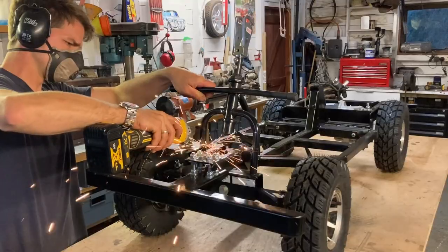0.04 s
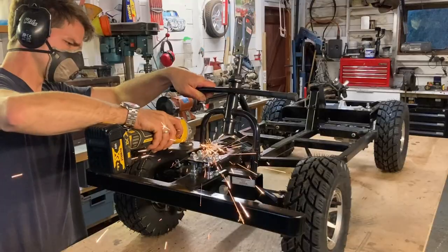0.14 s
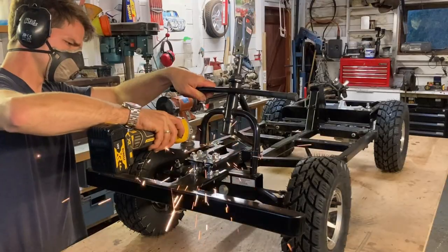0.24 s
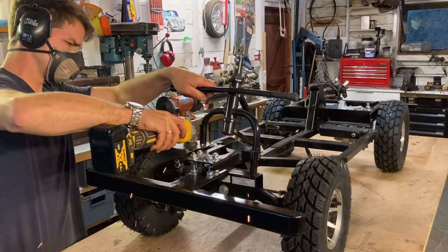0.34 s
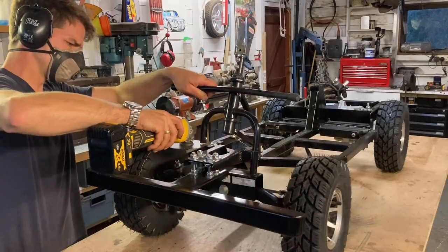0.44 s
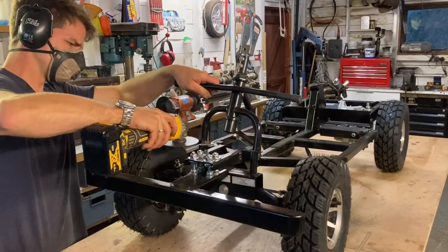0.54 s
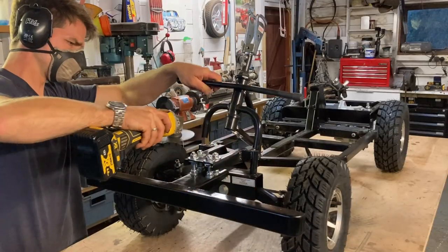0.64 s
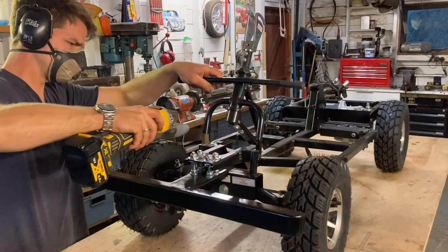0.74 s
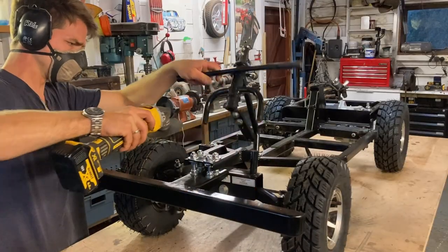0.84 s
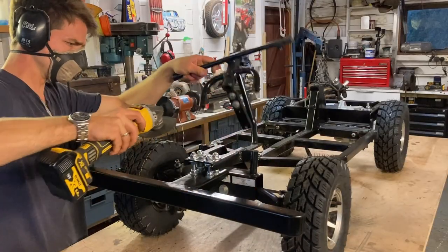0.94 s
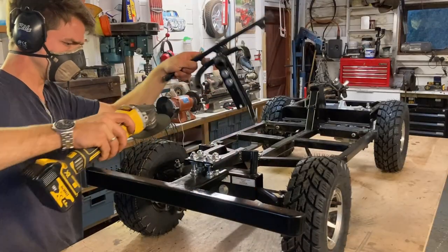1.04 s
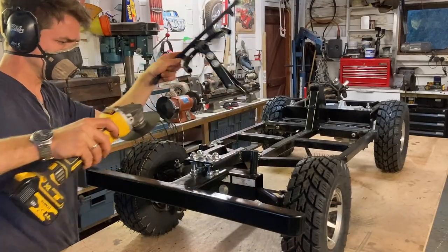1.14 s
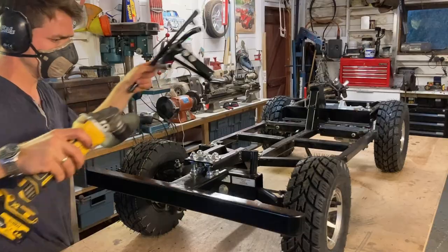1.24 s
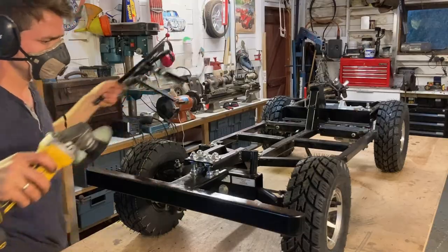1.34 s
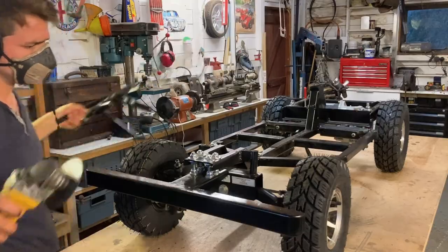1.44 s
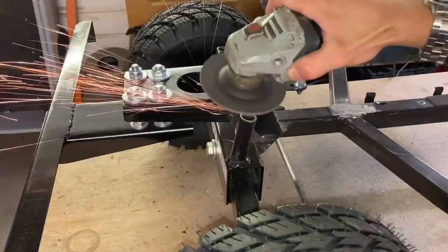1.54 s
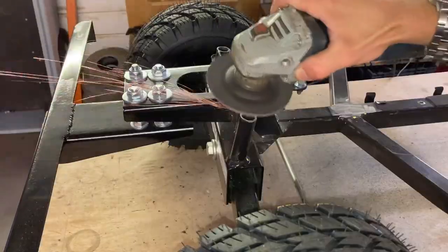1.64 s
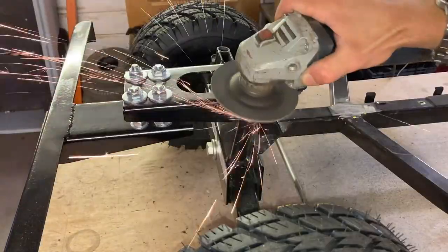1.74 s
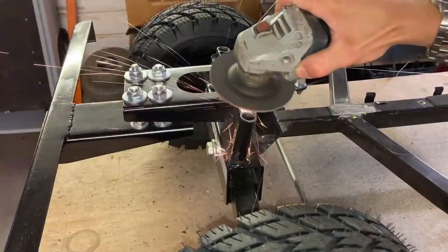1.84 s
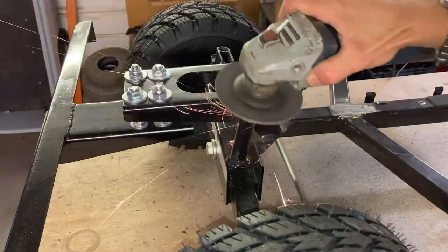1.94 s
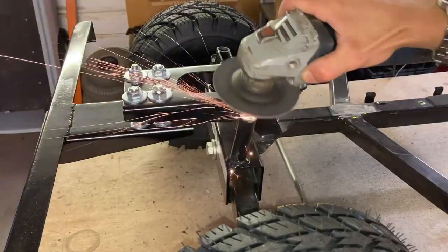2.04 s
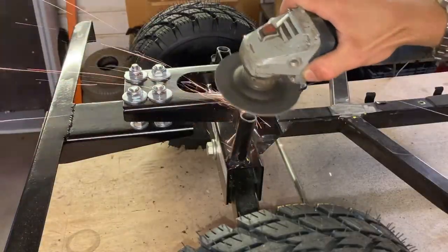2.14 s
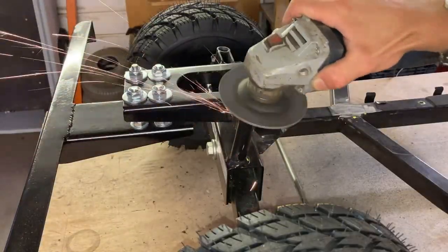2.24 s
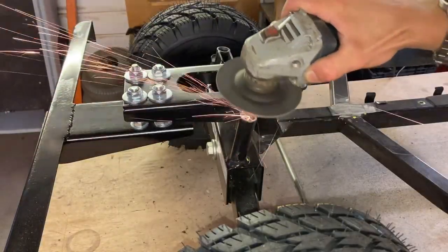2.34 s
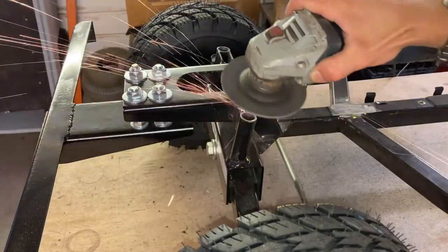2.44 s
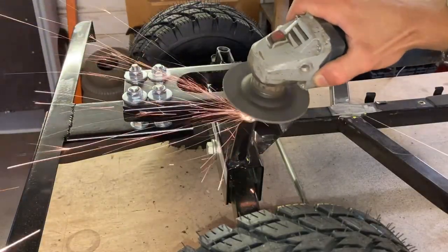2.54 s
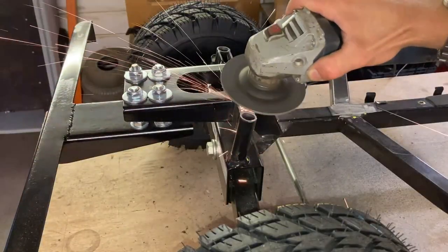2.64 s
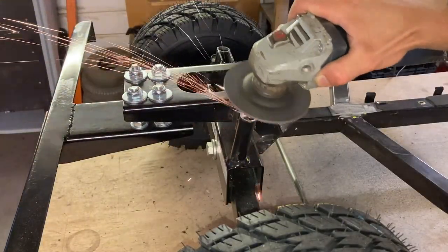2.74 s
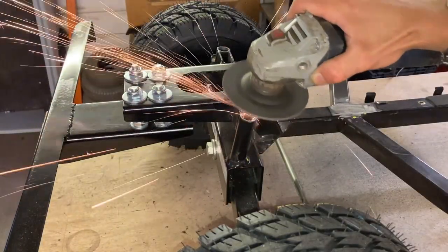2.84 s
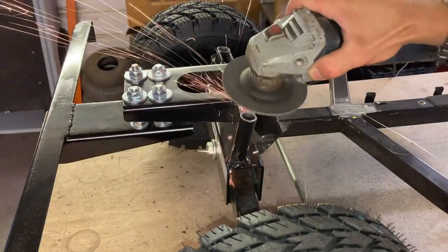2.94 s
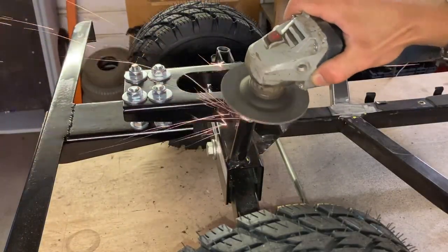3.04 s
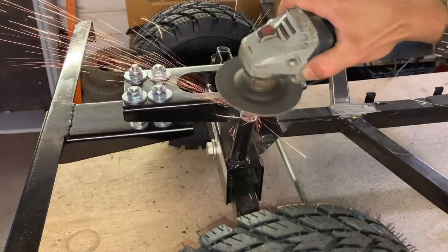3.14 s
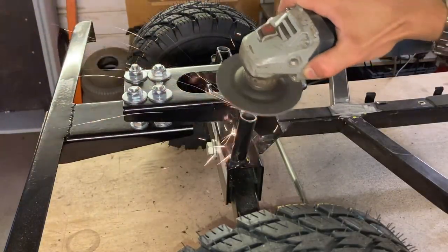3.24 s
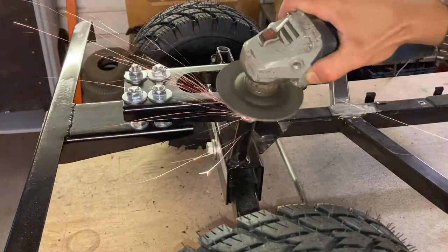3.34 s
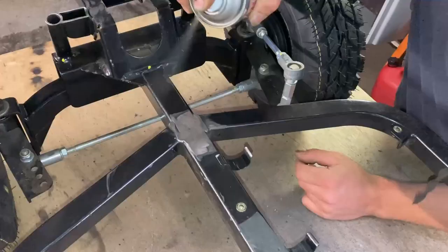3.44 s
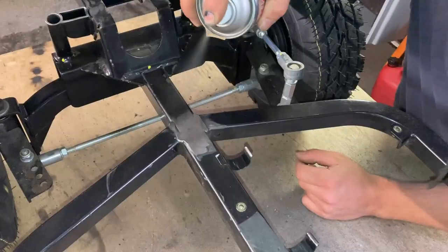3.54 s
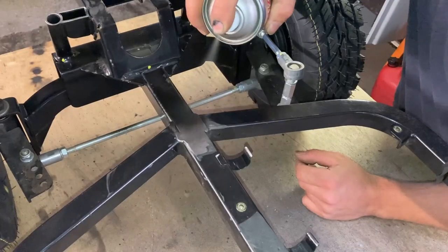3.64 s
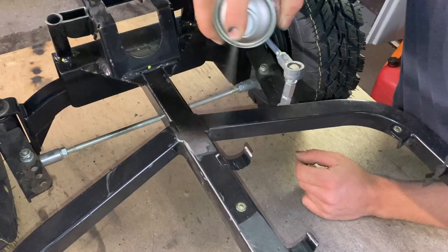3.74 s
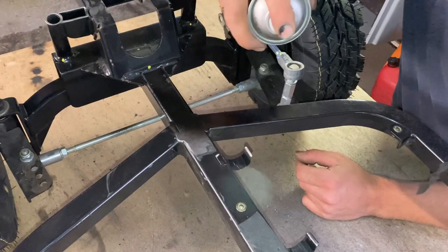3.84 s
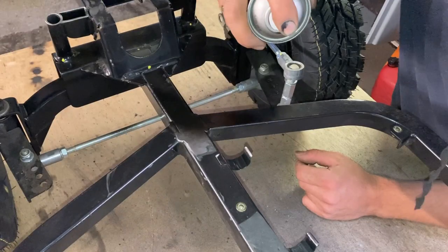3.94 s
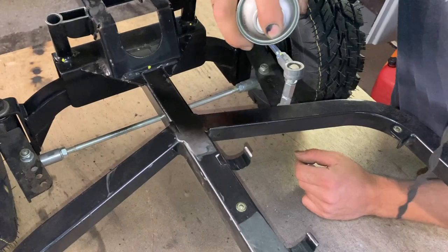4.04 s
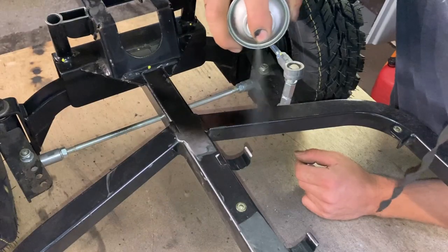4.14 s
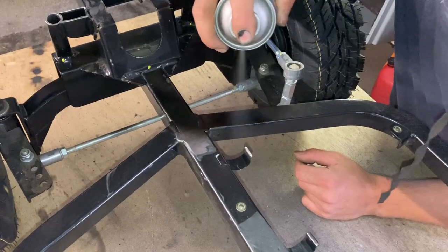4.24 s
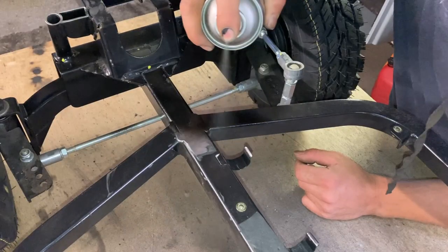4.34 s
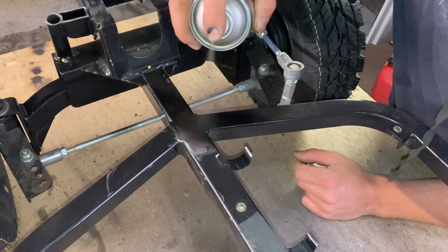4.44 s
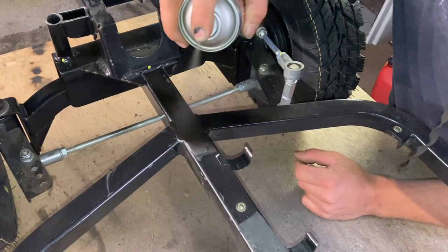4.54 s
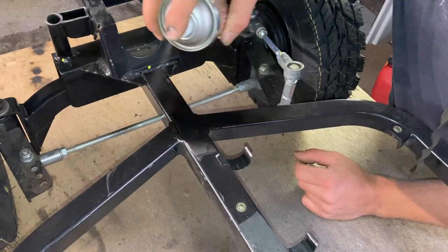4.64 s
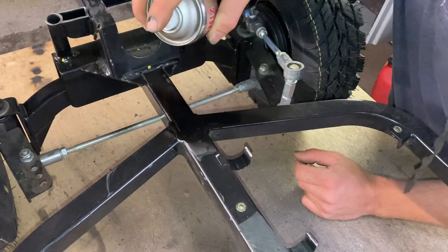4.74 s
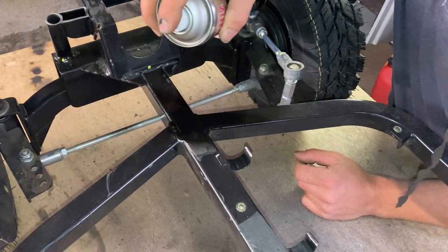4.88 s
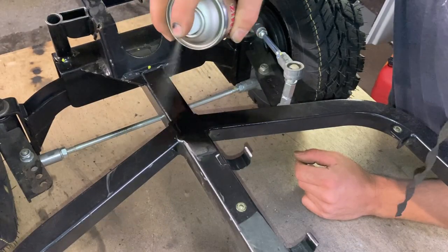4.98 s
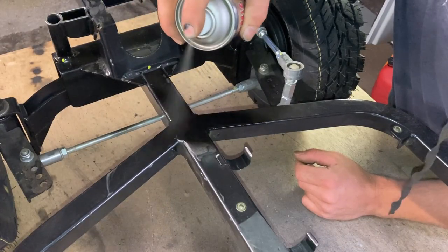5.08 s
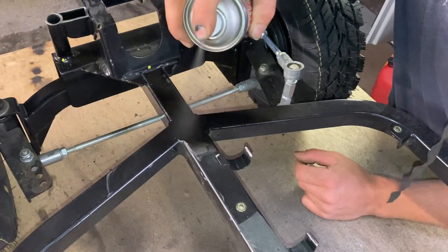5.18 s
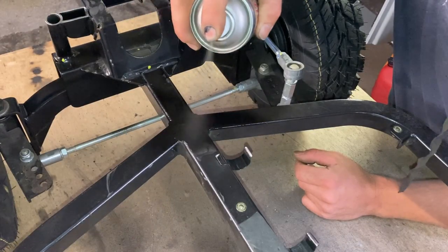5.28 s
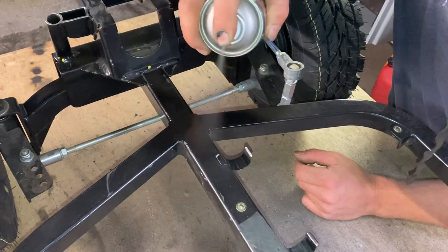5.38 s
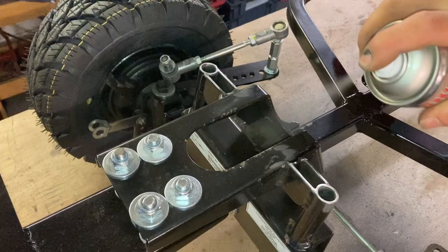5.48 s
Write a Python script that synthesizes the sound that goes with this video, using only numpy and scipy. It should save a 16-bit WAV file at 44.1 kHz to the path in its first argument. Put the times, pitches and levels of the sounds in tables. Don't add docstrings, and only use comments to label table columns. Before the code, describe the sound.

A power cutter buzzes harshly through a steel tube, spins free with a whine, then a grinder rasps steadily, then an aerosol can hisses three times.

```python
import sys
import numpy as np
from scipy import signal
from scipy.fft import rfft, irfft, next_fast_len
from scipy.io import wavfile
from scipy.ndimage import uniform_filter1d, map_coordinates

SR = 44100
rng = np.random.default_rng(int(sys.argv[2]) if len(sys.argv) > 2 else 0)


def pcm_store(signal):
    levels = np.round(np.clip(np.atleast_2d(signal), -1, 1) * 32767)
    wavfile.write(sys.argv[1], SR, levels.astype(np.int16).T)


def decibels_to_gain(level_db):
    exponent = np.asarray(level_db, float) / 20
    return 10 ** exponent


N = 242991
T = np.arange(N) / SR
M = next_fast_len(N, True)
HZ = np.fft.rfftfreq(M, 1 / SR)


def unit(x):
    return x / np.sqrt(np.mean(x ** 2))


def curve(rows):
    rows = np.array(rows)
    return [np.interp(T, rows[:, 0], column) for column in rows.T[1:]]


def tint(x, points):
    hz, db = np.transpose(points)
    gain = decibels_to_gain(np.interp(np.log(HZ + 1), np.log(hz), db))
    return unit(irfft(rfft(x, M) * gain, M)[:N])


def ring(x, hz, width):
    return unit(signal.lfilter(*signal.iirpeak(hz, hz / width, SR), x))


def walk(rate, size=N):
    knots = rng.standard_normal(12000)
    knots = uniform_filter1d(uniform_filter1d(knots, size=4), size=4)
    return np.interp(T[:size] * 4 * rate, np.arange(len(knots)), unit(knots))


def grit(spread_db, flicker_db):
    sizes = np.minimum(rng.exponential(size=N), 4)
    flurries = flicker_db * walk(300) + flicker_db * walk(36)
    return rng.standard_normal(N) * decibels_to_gain(spread_db * sizes + flurries)


# (time [s], bite level [dB])
CUT_LEVEL = [
    (0.0, -28),
    (0.162, -26),
    (0.192, -28),
    (0.466, -24),
    (0.48, -22),
]
# (frequency [Hz], density [dB per Hz])
BITE_SPECTRUM = [(40, -49), (200, -26), (700, -39), (1600, -13.5), (2300, 2), (3500, -8.5), (5000, -18),
                 (7000, 2.5), (8500, -3), (11500, -2.5), (14000, -4), (15500, -7.5)]
# (multiple of the turn [-], level in the full wall [dB], as it gives way [dB])
TUBE_ORDERS = [(3, -26.5, -13), (7, -19.5, -10.5), (6, -30, -16), (15, -8.5, -2.5), (4, -23, -9),
               (17, -6.5, -5), (18, 0.5, -9), (19, -3, 3), (21, -17, -4), (23, -2, -27), (24, -2.5, -19),
               (26, -5.5, -7.5), (30, -2, -8), (36, -3, -0.5)]


def cutting():
    turn_hz, speed_up_hz = 124.28, 0.8
    sag_hz, sag_s, sag_span_s = 0.5, 0.29, 0.07
    thin = np.clip((T - 0.26) / 0.073, 0, 1)
    sag = sag_hz * np.exp(-((T - sag_s) / sag_span_s) ** 2)
    phase = 2 * np.pi * np.cumsum(turn_hz + speed_up_hz * thin - sag) / SR
    phase = phase + 0.04 * thin * walk(14)

    peak_order, rest_peak_db, fall_db, floor_db = 21.8, -15, 8.5, -36.5
    strong = {round(k): (deep_db, thin_db) for k, deep_db, thin_db in TUBE_ORDERS}
    tube = np.zeros(N)
    for k in range(1, 39):
        rest_db = max(rest_peak_db - fall_db * np.log2(k / peak_order) ** 2, floor_db)
        deep_db, thin_db = strong.get(k, (rest_db, rest_db + 7))
        wander = (0.08 + 0.24 * thin[:SR]) * walk(8.8, size=SR)
        db = deep_db + thin[:SR] * (thin_db - 13.0 - deep_db) + 3.3 * walk(14.5, size=SR)
        tube[:SR] += decibels_to_gain(db) * np.sin(k * phase[:SR] + 2 * np.pi * rng.random() + wander)

    wear_per_s = 14
    rough = rng.standard_normal((12, 355))
    place = phase / (2 * np.pi) % 1 * (rough.shape[1] - 1)
    rim = map_coordinates(rough, [wear_per_s * T, place], order=1, mode="mirror")
    rim = tint(rim * decibels_to_gain(2 * walk(32.5)), [(2500, -92), (4000, -32), (5200, -15), (7000, -16.5),
                                           (8500, -19), (12000, -12), (15000, -27)])

    gate = decibels_to_gain(1.5 * np.cos(2 * phase) + 2.0 * np.cos(phase + 0.4) + 1.1 * np.cos(6 * phase))
    bite = tint(grit(0.8, 0.92) * gate, BITE_SPECTRUM)
    let_go_s, let_go_decay_s = 0.46, 0.034
    held = np.exp(-np.clip(T - let_go_s, 0, None) / let_go_decay_s)

    after = np.clip(T - 0.44, 0, None)
    thud = decibels_to_gain(-40.5) * np.sin(2 * np.pi * 105 * after) * np.exp(-after / 0.026)
    low = decibels_to_gain(-40.0) * np.sin(2 * np.pi * 368 * T) * np.exp(-((T - 0.495) / 0.049) ** 2)
    contact = decibels_to_gain(4.0) * bite + decibels_to_gain(5.5 - 6.3 * thin) * rim + decibels_to_gain(2.0) * tube
    return held * decibels_to_gain(curve(CUT_LEVEL)[0] - 4.5) * contact + thud + low


# (time [s], level [dB])
FREE_LEVEL = [
    (0.58, -45),
    (0.992, -44.5),
    (1.258, -39.5),
    (1.268, -38.5),
    (1.386, -41.5),
    (1.496, -38.5),
    (1.538, -40.5),
    (1.59, -36.5),
]
# (frequency [Hz], density [dB per Hz])
AIR_SPECTRUM = [(40, -7), (90, -7.5), (200, -23.5), (350, -10.5), (700, -9), (1100, -3.5), (2300, 0),
                (5000, -1.5), (8500, -5), (11500, -7.5), (14000, -15), (15500, -21.5)]


def spinning():
    air = tint(grit(1.0, 0.43), AIR_SPECTRUM)
    top = signal.sosfilt(signal.butter(2, 4500, "high", fs=SR, output="sos"), air)
    return decibels_to_gain(curve(FREE_LEVEL)[0] + 4.5) * (air + (decibels_to_gain(3.0) - 1) * top)


def motor():
    rotor_hz, poles = 442.7, 8
    whine_db, beam, far_db = -38.5, 2, -42
    whine_db = whine_db + beam * (curve(FREE_LEVEL)[0] - far_db)
    phase = 2 * np.pi * rotor_hz * T + 0.07 * walk(3)
    whine = np.sin(poles * phase) * decibels_to_gain(1.9 * walk(9.15))
    whine += decibels_to_gain(-27) * np.sin(2 * poles * phase + walk(9))
    disc_db = -61.0 - 9.6 * np.clip(T - 0.5, 0, 1) + 2.3 * walk(2.8)
    disc = decibels_to_gain(disc_db) * np.sin(2 * np.pi * 372 * T)
    unload = np.clip((T - 0.3) / 0.067, 0.15, 1)
    return unload * (decibels_to_gain(whine_db + 2.5) * whine + disc) + decibels_to_gain(-57) * np.sin(phase)


# (frequency [Hz], density [dB per Hz])
SPARK_SPECTRUM = [(40, -20.5), (200, -28), (350, -13.5), (700, -26), (1100, -8), (2300, -4), (5000, -4.5),
                  (7000, -0.5), (11500, 3.5), (13000, 0), (14000, -13.5), (15500, -11)]
# (frequency [Hz], bandwidth [Hz], level [dB])
BRACKET_MODES = [(709, 117, -4.5), (1134, 12, -24), (1289, 65, -2.5), (1647, 17, -6), (1943, 87, -6.5),
                 (2560, 280, -1), (3690, 100, -6.5), (4420, 42, -3.5)]
# (frequency [Hz], level [dB])
HUM_TONES = [(100, -63), (158.3, -61), (316.6, -56)]


def grinding():
    push_db, waver_db = -25.0, -0.54
    guard_db, guard_flicker_db = -40.5, 2.4
    gate = decibels_to_gain(0.2 * np.cos(2 * np.pi * 170.0 * T))
    tear = grit(3.4, 0.28) * gate
    steel = sum(decibels_to_gain(db) * ring(tear, hz, width) for hz, width, db in BRACKET_MODES)
    turn = 2 * np.pi * np.cumsum(1111 - 4 * (T - 1.7)) / SR
    guard = np.sin(turn + 0.5 * walk(14.0)) + 0.41 * ring(tear, 1114, 27.5)
    hums = sum(decibels_to_gain(db + 0.83 * walk(8.1)) * np.sin(2 * np.pi * hz * T) for hz, db in HUM_TONES)
    contact = tint(tear, SPARK_SPECTRUM) + decibels_to_gain(-17) * unit(steel)
    out = decibels_to_gain(push_db + waver_db * walk(6.02)) * contact
    return out + decibels_to_gain(guard_db + guard_flicker_db * walk(17)) * guard + hums


# (opening time [s], shutting time [s], jet level [dB], bleed relative to it [dB])
VALVE_STROKES = [
    (3.3, 3.905, -27.5, -18),
    (4.188, 4.752, -27, -26),
    (4.963, 5.7, -27.5, -26),
]
# (frequency [Hz], density [dB per Hz])
JET_SPECTRUM = [(700, -14), (1600, -17.5), (2500, -8), (3300, -18.5), (4000, -6.5), (5200, -13.5),
                (7000, 2), (8500, 2), (11500, 4.5), (13000, 4.5), (14000, -16.5), (15500, -5)]
# (time [s], level [dB])
FRAME_SWEEPS = [
    (3.68, -58.5),
    (3.86, -51.5),
    (4.45, -48),
    (4.57, -49),
    (5.23, -50.5),
    (5.315, -47.5),
    (5.44, -52.5),
]
# (time [s], level [dB], frequency [Hz], bandwidth over frequency [-])
VALVE_TICKS = [
    (3.8994, -29, 10900, .6),
    (3.927, -24.5, 3500, 1),
    (3.986, -26.5, 3620, 1),
    (4.182, -36, 10900, 0.25),
    (4.191, -32, 12000, 0.23),
    (4.803, -41, 4200, 0.22),
    (4.9474, -45, 7400, 0.14),
    (4.9546, -41, 11000, .3),
]


def spraying():
    open_s, close_s, bleed_s = 0.029, 0.031, 0.046
    jet = tint(grit(0.45, 1.2), JET_SPECTRUM)
    splash = ring(ring(rng.standard_normal(N), 215, 50), 212, 60)
    flow, mist = np.zeros(N), np.zeros(N)
    for opens, shut, db, bleed_db in VALVE_STROKES:
        opening = np.clip((T - opens) / open_s, 0, 1) ** 2.3
        closing = np.clip((shut - T) / close_s, 0, 1) ** 1.16
        bleed = decibels_to_gain(bleed_db) * np.exp(-np.clip(T - shut, 0, None) / bleed_s)
        flow += decibels_to_gain(db) * opening * np.maximum(closing, bleed)
        mist += (T > opens) * (1 - closing) * bleed
    rest_db, sweep_s = -68, 0.055
    sweep = decibels_to_gain(rest_db) + sum(decibels_to_gain(db) * np.exp(-((T - s) / sweep_s) ** 2) for s, db in FRAME_SWEEPS)
    sputter_db = 0.8 * walk(14)
    out = flow * decibels_to_gain(1.0 + sputter_db) * jet + sweep * splash
    out += decibels_to_gain(-28) * mist * ring(grit(2.5, 1.7), 4000, 3500)
    for s, db, hz, share in VALVE_TICKS:
        age = np.clip(T - s, 0, None)
        tick = ring(ring(rng.standard_normal(N), hz, share * hz), hz, share * hz)
        out += (T > s) * decibels_to_gain(db - 10) * np.exp(-age / 0.0066) * tick
    return out


# (time [s], level [dB])
FAN_BEATS = [
    (3.6, 1.5),
    (4.02, 3.5),
    (4.44, -3),
    (4.62, 1.5),
    (4.9, -1),
    (5.2, 2.5),
]
# (frequency [Hz], density [dB per Hz])
WASH_SPECTRUM = [(40, 7.5), (200, -9.5), (350, -20), (700, -7.5), (1100, -6), (1600, -15.5), (2300, -26),
                 (3500, -53), (5000, -53), (8500, -52), (14000, -41)]


def shop():
    fan_hz, sag_hz, slows_s = 90.5, 1.43, 4.97
    fan_db, waver_db = -40.5, 1.3
    hz = fan_hz - sag_hz * np.clip((T - slows_s) / 0.06, 0, 1)
    drone = np.sin(2 * np.pi * np.cumsum(hz) / SR + 0.5 * walk(4.9))
    drone += 0.17 * ring(rng.standard_normal(N), 85, 40)
    drone += 0.34 * ring(rng.standard_normal(N), 69.5, 14.7)
    wash = tint(grit(0.29, 0.45), WASH_SPECTRUM)
    drone_db = fan_db + curve(FAN_BEATS)[0] + waver_db * walk(7.9)
    return decibels_to_gain(drone_db) * drone + decibels_to_gain(-48.5 + 0.5 * walk(3.3)) * wash


def ports(x, lag_s, wet_db, t60, blur, pan_db):
    t = T[:SR]
    tails = rng.standard_normal((3, SR)) * np.exp(-np.log(1000) * t / t60) * (t > 0.004)
    soft = uniform_filter1d(tails, size=5)
    tails = soft + (tails - soft) * np.exp(-t / 0.096)
    tails = rfft(tails / np.sqrt(np.sum(tails ** 2, axis=1, keepdims=True)), M)
    high = np.clip((HZ - 5000) / 1300, 0, 1)
    turn = -(1 - high) * 2 * np.pi * HZ * lag_s + high * 2 * np.pi * (HZ - 6880) / 4520
    apart = blur * np.clip(HZ / 900, 0.06, 1) * np.clip((6400 - HZ) / 1500, 0, 1) + 0.03 * high
    shade = pan_db * np.exp(-np.log((HZ + 1) / 2000) ** 2 / 1.1)
    sides = np.array([[-1], [1]])
    both = (1 + decibels_to_gain(wet_db) * tails[0]) * np.exp(0.5j * turn * sides) * decibels_to_gain(-0.5 * shade * sides)
    both = both + apart * tails[1:]
    return irfft(rfft(x, M) * both / np.sqrt(1 + apart ** 2), M)[:, :N]


# (fade-in start time [s], end time [s])
SCENE_SPANS = [
    (-1, 1.5945),
    (1.615, 3.4765),
    (3.501, 6),
]


def scene():
    tube = ports(cutting(), 0.00007, -30.5, 1.0, 0.15, 2.3)
    tube = tube + ports(spinning(), 0.00009, -8.5, 1.0, 1.36, 6.0)
    tube = tube + ports(motor(), 0.00009, -48, 0.3, 0.065, 0.44)
    bracket = ports(grinding(), 0.00005, -11, 0.54, 0.41, 2.0)
    can = ports(spraying(), 0.0001, -18.5, 0.13, 1.0, 0.49)
    can = can + ports(shop(), 0.0001, -33, 1.0, 1.07, 0.2)

    out = decibels_to_gain(-108) * rng.standard_normal((2, N))
    fade_s, fade_power, cut_s = 0.16, 1.41, 0.00011
    for sound, (start, end) in zip([tube, bracket, can], SCENE_SPANS):
        rise = np.clip((T - start) / fade_s, 0, 1) ** fade_power
        late = np.clip(T - end, 0, None)
        out += sound * rise * (np.exp(-late / cut_s) + decibels_to_gain(-20) * np.exp(-late / 0.0025))
    click = sum(np.exp(-np.abs(T - end - 0.0205) / 0.0004) for _, end in SCENE_SPANS)
    return out + decibels_to_gain(-56) * click * rng.standard_normal(N)


def band_limit(x):
    return signal.sosfilt(signal.butter(12, 17120, fs=SR, output="sos"), x)


def record(dry):
    dry = signal.sosfilt(signal.butter(3, 48, "high", fs=SR, output="sos"), dry)
    dry = dry + 1.1 * signal.lfilter(*signal.iirpeak(15400, 9, SR), dry)
    dry = signal.sosfilt(signal.ellip(10, 0.2, 80, 15650, fs=SR, output="sos"), dry)
    return band_limit(dry)


dry = scene()
out = record(dry)
pcm_store(out)
```